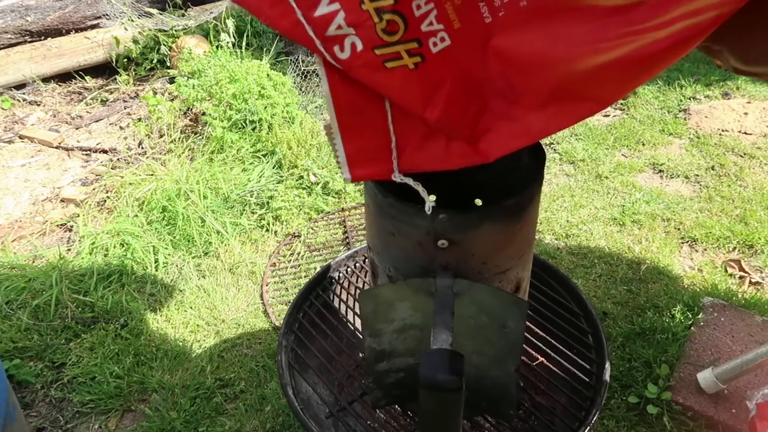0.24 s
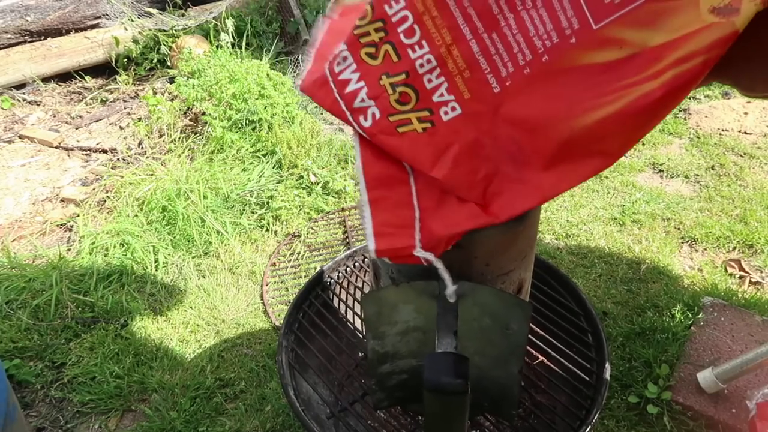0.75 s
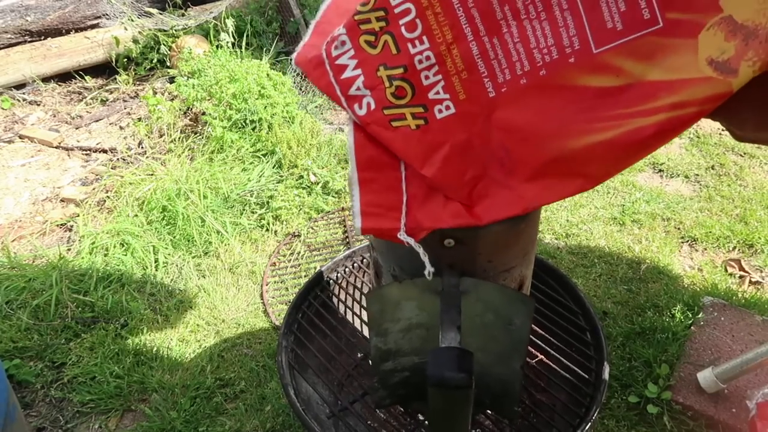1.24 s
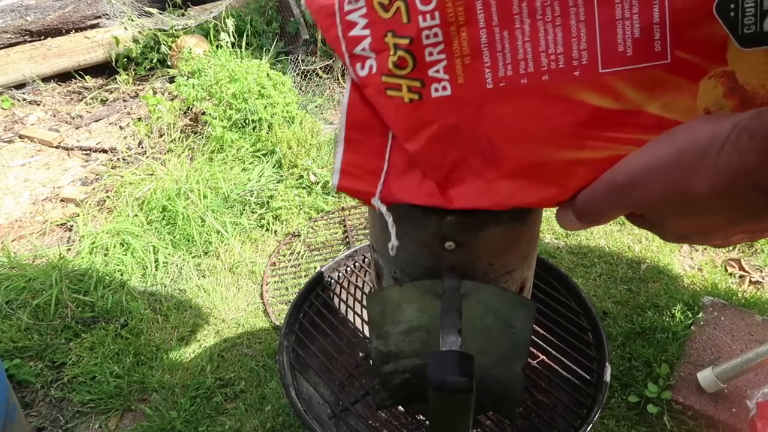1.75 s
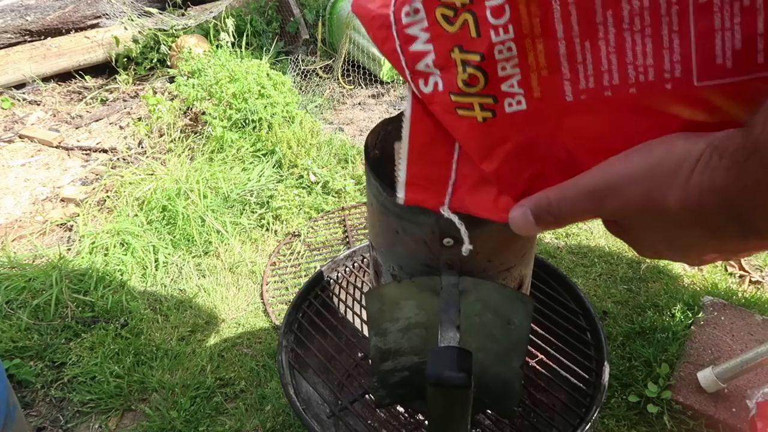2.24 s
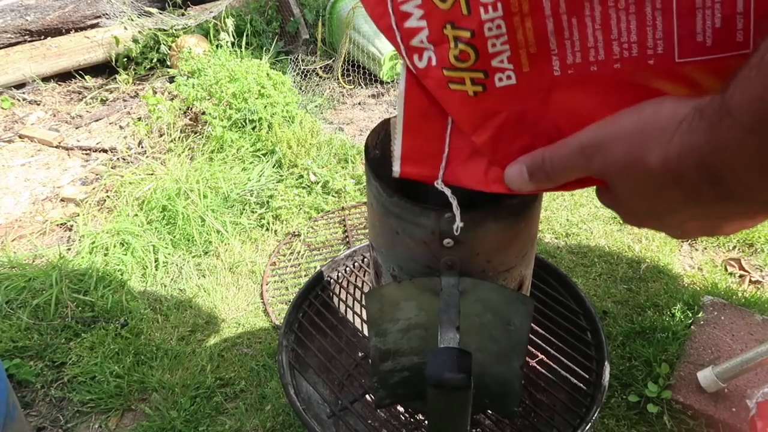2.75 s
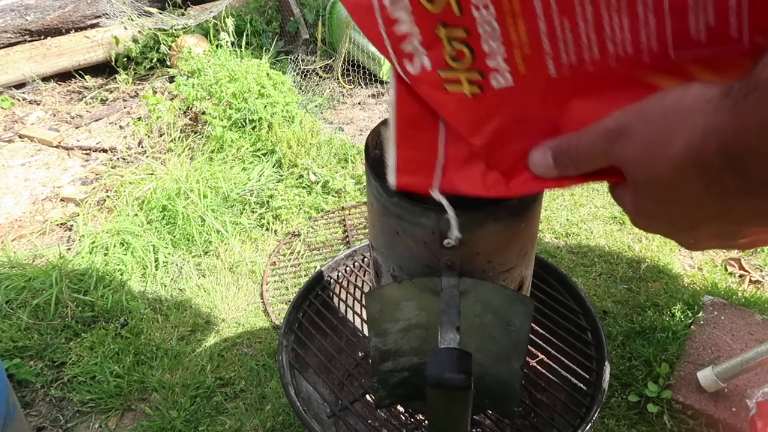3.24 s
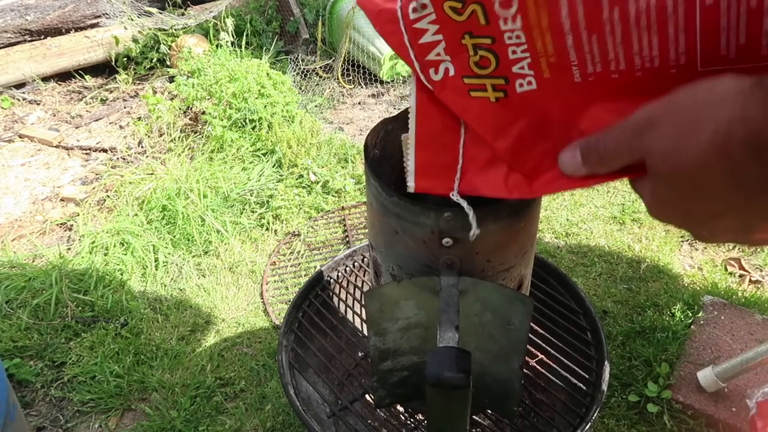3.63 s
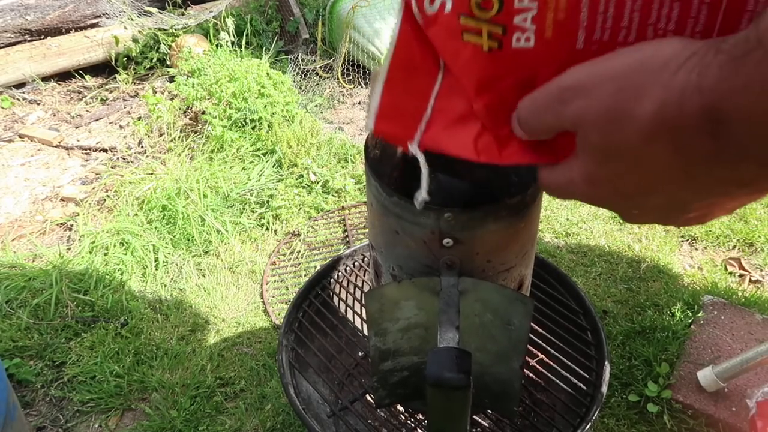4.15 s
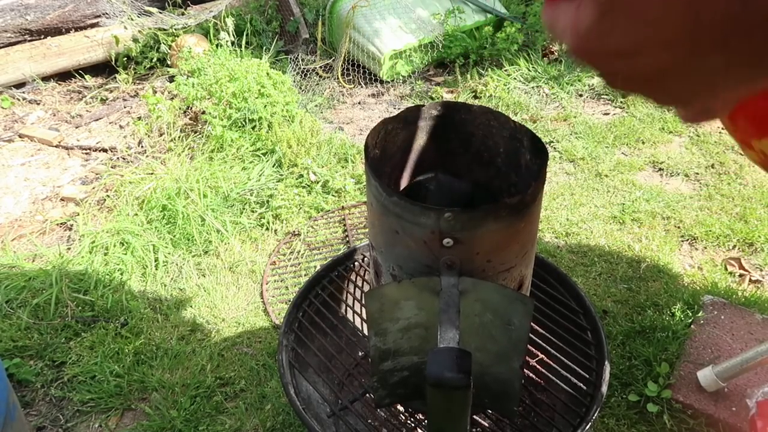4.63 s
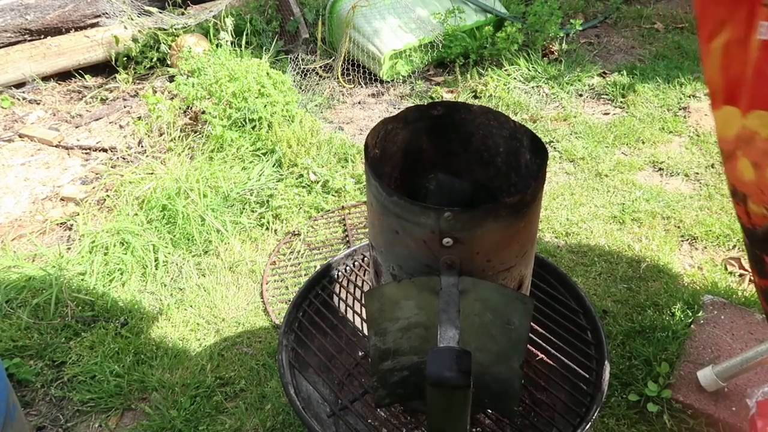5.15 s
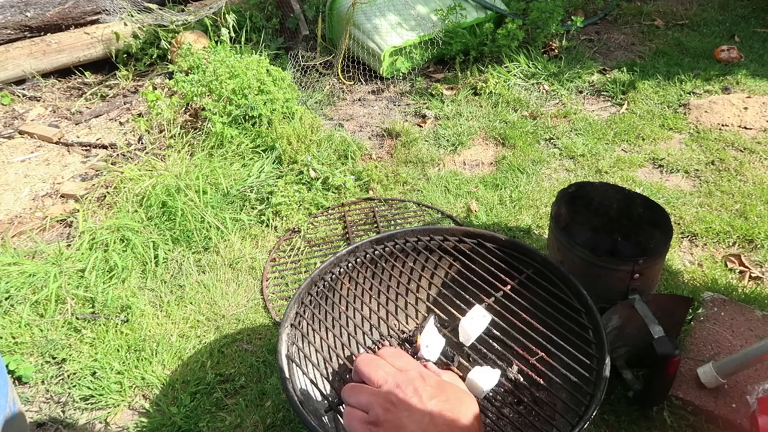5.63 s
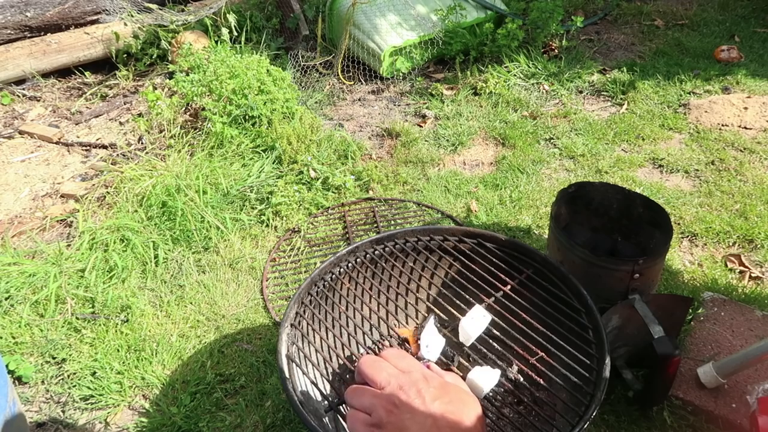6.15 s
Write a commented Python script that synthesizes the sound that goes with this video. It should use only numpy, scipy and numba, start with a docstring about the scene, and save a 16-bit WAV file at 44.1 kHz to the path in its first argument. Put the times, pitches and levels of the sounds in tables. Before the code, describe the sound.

A dense, woody and stony clatter of charcoal tumbles into a thin steel tube, loud and close. It begins with strong bursts, thins to scattered knocks and gritty slides, then swells again before stopping abruptly. Behind it is quiet outdoor air with far traffic. A tiny rustle follows, then faint, husky bird chirps slide downward at the end.

```python
"""Charcoal lumps tumble from a paper bag into a sheet-metal chimney, close to a two-port camera microphone.
Every contact is a sum of damped sines: the loudest blows are timed one by one, the rest rattle at random
with the flow of the pour, and the steel tube adds its ring and a short noisy tail.
A quiet garden of shaped noise lies under all; once the pour is faded out, its distant rumble, a faint
rustle and the sliding whistles of a small bird are left."""
import sys
import numpy as np
from scipy import signal
from scipy.fft import rfft, irfft
from scipy.io import wavfile
from scipy.ndimage import uniform_filter1d
from numba import njit

SR = 44100
rng = np.random.default_rng(int(sys.argv[2]) if len(sys.argv) > 2 else 0)


def output_pcm(signal):
    """Save a mono or channel-first signal as 16-bit PCM at the path in sys.argv[1].

    Samples are clipped to [-1, 1] before scaling.
    """
    pcm = np.clip(np.atleast_2d(signal).T, -1, 1) * 32767
    wavfile.write(sys.argv[1], SR, np.round(pcm).astype(np.int16))


N = 282240
CONTACT_CYCLES = .17  # a ring swells with this time constant, in its own cycles


def undb(db):
    """Gain of a level in dB."""
    return 10 ** (np.asarray(db) / 20)


def at(table, hz):
    """Read (Hz, value) points on a log-frequency axis."""
    f, v = np.transpose(table)
    return np.interp(np.log(hz), np.log(np.maximum(f, 1)), v)


def unit(x):
    """Scale to rms 1."""
    return x / np.sqrt(np.mean(x ** 2))


def surge(rate):
    """Slow chance of rms 1: noise averaged twice over 1 / rate seconds."""
    k = int(SR / rate)
    return unit(uniform_filter1d(uniform_filter1d(rng.standard_normal(N), k), k))


def garden():
    """Distant traffic and leaves: shaped noise whose level wanders a little; something rustles once."""
    # Spectrum of the garden air. Each row: frequency in Hz, relative level in dB per Hz.
    air_spectrum = [(15, -33), (25, -6.5), (70, -11.5), (107, -3.5), (326, -15.5), (781, -18),
                    (1130, -24.5), (12900, -45.5), (14000, -47)]
    # How alike the two ports hear the air. Each row: frequency in Hz, left-right likeness (-1 to 1).
    likeness = [(60, 1), (130, 1), (290, 0.88), (640, 0.66), (1410, 0.6), (3100, 0.38), (6820, -0.23),
                (15000, -0.84)]
    level_db = -42.5
    rustle_s, rustle_length_s, rustle_gain = 5.935, .04, .7

    hz = np.maximum(np.fft.rfftfreq(N, 1 / SR), 1)
    like = np.clip(at(likeness, hz), -.9995, .9995)

    def shaped_noise(sign):
        spectrum = rfft(rng.standard_normal(N)) * undb(at(air_spectrum, hz))
        return irfft(spectrum * np.sqrt(1 + sign * like), N)

    mid, side = shaped_noise(1), shaped_noise(-1)
    wander_db = .8 * surge(15) + .7 * surge(3)
    air = np.array([mid + side, mid - side]) / np.std(mid) * undb(level_db + wander_db)
    # the rustle is a brief lift of the treble of the air
    puff = np.exp(-((np.arange(N) / SR - rustle_s) / rustle_length_s) ** 2)
    treble = signal.lfilter(*signal.butter(2, 1500, "high", fs=SR), air)
    return air + rustle_gain * puff * treble


def bird():
    """Thin, husky sliding whistles: sines unsteady in pitch and level, smeared by distance."""
    # Notes of the bird. Each row: start in seconds, end in seconds, start pitch in Hz, end pitch in Hz,
    # level in dB before the unsteadiness and the smearing.
    notes = [(6.125, 6.19, 4050, 3950, -67), (6.145, 6.245, 3900, 2950, -61), (6.22, 6.29, 4480, 4550, -66),
             (6.325, 6.42, 4580, 4500, -69), (6.33, 6.4, 3950, 3800, -62), (6.345, 6.41, 3750, 2700, -61.5)]
    t, out = np.arange(N) / SR, np.zeros(N)
    for start, end, start_hz, end_hz, db in notes:
        u = np.clip((t - start) / (end - start), 0, 1)
        # steeper slides waver more in pitch
        waver = 0.055 * surge(240) * abs(1 - end_hz / start_hz) ** 0.33
        hz = (start_hz + (end_hz - start_hz) * u) * (1 + waver)
        swell = np.sqrt(2 * np.sin(np.pi * u))
        out += undb(db + 5 * surge(250)) * swell * np.sin(2 * np.pi * np.cumsum(hz) / SR)
    # distance: a short fading noise echo, unlike on the two sides
    fade = np.exp(-np.arange(3000) / 600)
    echo = rng.standard_normal((2, len(fade))) * fade
    far = signal.fftconvolve(out[None], echo / np.sqrt(np.sum(fade ** 2)), axes=1)[:, :N]
    return .6 * out + 1.2 * far


@njit
def ring(start, pole, size, rise, count):
    """Sum of damped sines, each starting between two samples and swelling while the contact lasts."""
    y = np.zeros(count)
    for k in range(len(start)):
        i = max(int(np.ceil(start[k])), 0)
        z = size[k] * pole[k] ** (i - start[k])
        soft = rise[k] ** (i - start[k])
        # stop once the ring has decayed to .003
        end = min(count, i + int(np.log(.003) / np.log(abs(pole[k]))))
        for j in range(i, end):
            y[j] += z.imag * (1 - soft)
            z *= pole[k]
            soft *= rise[k]
    return y


def ports(s, hz, cycles, size, side, contact=CONTACT_CYCLES):
    """Blows reach the left port later; side (spread 1) is where each lands; only treble is shadowed."""
    # Balance of the two ports. Each row: frequency in Hz, left minus right in dB.
    balance = [(150, 0), (500, -.8), (1500, -2.4), (5000, -1.6), (12000, -.3)]
    lag_s, lag_spread_s = 3.4e-5, 8e-6
    pan_db, shadow_hz = 6.5, 4000

    hz = np.minimum(hz, .45 * SR)
    # each ring falls by 60 dB over its cycles
    pole = np.exp((2j * np.pi - np.log(1000) / cycles) * hz / SR)
    rise = np.exp(-hz / SR / contact)
    # the housing lengthens the path for treble
    lag = (lag_s + lag_spread_s * side) * np.clip(.35 + hz / 15000, 0, 1)
    tilt_db = at(balance, hz) + pan_db * side * hz / (hz + shadow_hz)

    def port(sign):
        return ring((s + sign * lag / 2) * SR, pole, size * undb(sign * tilt_db / 2) + 0j, rise, N)

    return np.array([port(1), port(-1)])


def contacts(rate, lo_hz, hi_hz, cycles, scatter_db, count):
    """Random contacts, rate per second, each ringing count pitches; loud ones are rare; rms 1."""
    # Spectrum of the rattle. Each row: frequency in Hz, relative level in dB per Hz.
    rattle_spectrum = [(35, -39), (60, -7), (263, 3.5), (317, 2.5), (762, -15.5), (1300, -16.5),
                       (1560, -17.5), (10100, -29.5), (12200, -26.5), (15000, -102)]
    c = rng.random((int(rate * N / SR), 3 + 2 * count))
    s = c[:, :1] * N / SR
    side = (c[:, 1:2] - .5) * np.sqrt(12)
    # one pitch in each of count equal steps of the range
    hz = lo_hz * (hi_hz / lo_hz) ** ((np.arange(count) + c[:, 3:3 + count]) / count)
    db = -scatter_db * np.log(1 - c[:, 2:3]) + at(rattle_spectrum, hz) + 20 * np.log10(hz)
    size = undb(db) * (2 * c[:, 3 + count:] - 1)
    return unit(ports(*(np.broadcast_to(v, hz.shape).ravel() for v in (s, hz, cycles, size, side))))


def shares(level_db, bright_db):
    """Power of thud, clack and grit for a level and a brightness; grit answers brightness more."""
    clack_db, grit_db, grit_per_bright = -3, -12, 1.7  # clack and grit against the thud at brightness 0
    thud = level_db
    clack = level_db + clack_db + bright_db
    grit = level_db + grit_db + grit_per_bright * bright_db
    return undb([thud, clack, grit]) ** 2


def rattle():
    """Lumps thud on lumps, clack on the wall, and paper and grit crackle; small random slips move the level."""
    # Flow of the pour. Each row: time in seconds, thud level in dB ahead of the tube, brightness in dB.
    flow = [(0.0, -44.5, 9.5), (.06, -29.5, 3), (0.24, -33.5, -0.5), (.33, -36, -2), (.47, -26, -0.5),
            (0.62, -22, -0.5), (0.88, -19, 2), (1.13, -21.5, -1), (1.22, -32, 3.5), (1.55, -17.5, 0.5),
            (1.7, -22, 1.5), (1.78, -25, -1.5), (2.1, -39.5, -1), (2.33, -36.5, 1), (2.6, -40.5, 8),
            (2.92, -27, -3), (3.2, -37, 4.5), (3.47, -34.5, -0.5), (3.62, -40.5, 6.5), (3.86, -21.5, -5),
            (3.93, -57.5, 11.5), (4.14, -40, 6.5), (4.43, -31, 1), (4.66, -24, 2), (4.95, -21, -0.5),
            (5.17, -24.5, 2), (5.35, -19.5, -0.5)]
    # Short slides of several lumps. Each row: start in seconds, length in seconds,
    # thud level in dB ahead of the tube, brightness in dB.
    slides = [(0.034, 0.035, -21, 4.5), (0.347, 0.072, -24.5, 0), (0.475, 0.045, -20.5, -0.5),
              (0.523, 0.037, -20, -2.5), (0.609, 0.098, -22.5, 1.5), (0.697, 0.083, -21, 3.5),
              (0.797, 0.018, -12.5, -1.5), (0.882, 0.037, -13.5, 0), (1.067, 0.081, -16.5, -2),
              (1.151, 0.044, -14.5, 0.5), (1.587, 0.014, -35.5, 17), (1.632, 0.03, -28.5, 10),
              (1.752, .018, -29, 5.5), (1.802, 0.03, -24, 5), (1.909, 0.16, -36, 8.5),
              (2.01, 0.047, -34.5, 7), (2.124, 0.025, -29, -3), (2.339, 0.045, -25.5, 3.5),
              (2.47, 0.098, -26, 0.5), (2.591, 0.066, -20.5, -0.5), (2.663, 0.013, -24, 6),
              (2.689, 0.032, -21.5, -4), (2.833, 0.073, -34.5, 9), (2.95, 0.051, -16, 1),
              (3.102, 0.014, -18, -2.5), (3.2, 0.077, -27, 2), (3.282, 0.079, -23, 2),
              (3.319, 0.061, -18, -3), (3.509, 0.0045, -19.5, -2), (3.592, 0.029, -27.5, 4),
              (3.634, 0.12, -22, 2), (3.707, 0.013, -8, -5), (3.79, 0.05, -24, 1.5),
              (3.951, 0.049, -41, 6.5), (4.087, 0.19, -33, 3.5), (4.215, 0.013, -37.5, 9.5),
              (4.283, 0.0069, -25.5, 0), (4.497, 0.033, -23, -3), (4.584, 0.021, -36, 10),
              (4.663, 0.054, -16, 0), (4.788, 0.075, -25, 3.5), (4.887, 0.042, -21.5, -11),
              (5.009, 0.056, -19.5, 0), (5.094, 0.0074, -37, 15.5), (5.21, 0.11, -27, 0.5)]
    s, level_db, bright_db = np.transpose(flow)
    t = np.arange(N) / SR
    slip = undb(1.2 * surge(37.5))

    thud = contacts(600, 66., 800., 10., 1.7, count=3) * slip
    # dense small chips under fewer, fuller knocks of whole lumps
    chips = contacts(1500, 700., 3000., 32., 1.2, count=2) * slip
    knocks = contacts(180, 400., 3200., 32., 1.6, count=4)
    clack = unit(chips + 1.15 * knocks)
    grit = contacts(9000, 3000., 14000., 30., .9, count=3) * slip

    power = shares(np.interp(t, s, level_db), np.interp(t, s, bright_db))
    for start, length, db, bright in slides:
        # a slide sets in fast, holds and dies away
        u = np.clip((t - start) / length, 0, 8)
        envelope = np.minimum(8 * u, 1) * np.exp(-1.2 * u ** 2)
        power = power + shares(db, bright)[:, None] * envelope
    return sum(x * np.sqrt(p) for x, p in zip((thud, clack, grit), power))


def blows():
    """A loud blow rings the lump's body and bite; chips sound at chance pitches, then bounce ever weaker."""
    # Loud blows of single lumps. Each row: start in seconds, body pitch in Hz, body level in dB,
    # bite pitch in Hz, bite level in dB; the levels are relative, ahead of the strike gain.
    blow_list = [(0.042, 756, -10, 5640, -18), (0.0509, 760, -13, 1820, -23),
                 (0.0905, 845, -17.5, 1660, -26), (0.3446, 1060, -21.5, 3040, -30.5),
                 (0.499, 403, -9.5, 2020, -26), (0.529, 302, -15, 2680, -20.5),
                 (0.537, 560, -17, 2260, -19), (0.8189, 1090, -7.5, 3050, -33),
                 (0.833, 480, -11, 1680, -23), (0.865, 194, -25, 1540, -14), (0.8905, 500, -12, 2700, -26),
                 (0.961, 500, -28, 9650, -18), (1.002, 189, -14, 1660, -22), (1.108, 410, -9, 1580, -17),
                 (1.162, 730, -10, 4750, -25), (1.167, 875, -9.5, 1620, -25),
                 (1.3624, 383, -13.5, 1530, -32), (1.3667, 900, -25, 5900, -22),
                 (1.401, 387, -15, 1440, -39), (1.455, 232, -16, 1500, -22), (1.5491, 229, -12, 1750, -41),
                 (1.6605, 477, -14, 3420, -18), (1.6795, 348, -4.5, 2350, -33),
                 (1.725, 276, -25, 1630, -23.5), (1.92, 850, -17, 2640, -31),
                 (1.9679, 1070, -17, 2760, -18.5), (2.344, 1070, -27, 3330, -23),
                 (2.4571, 567, -12.5, 1940, -17), (2.554, 350, -21, 2500, -20.5),
                 (2.6327, 466, -18, 2050, -18), (2.74, 290, -15, 1480, -32), (2.861, 260, -17, 1840, -14),
                 (2.9648, 476, -22, 2360, -15.5), (3.0097, 323, -7, 1620, -30),
                 (3.108, 168, -24, 3550, -26), (3.2115, 458, -29, 2370, -23),
                 (3.2555, 260, -46, 3100, -17.5), (3.334, 279, -34, 3430, -15.5),
                 (3.647, 167, -17.5, 3270, -13.5), (3.6533, 278, -14, 2190, -14),
                 (3.6906, 340, -13, 2170, -14), (3.6961, 740, -16, 1900, -14),
                 (3.7204, 490, -19, 6600, -13), (3.7237, 333, -20, 2460, -13.5),
                 (3.769, 190, -43, 1600, -23), (3.7903, 266, -10, 1340, -17.5),
                 (3.902, 300, -35, 2570, -27.5), (3.9636, 1020, -39, 2770, -22.5),
                 (4.176, 252, -20.5, 1800, -25), (4.28, 317, -11.5, 1950, -24),
                 (4.321, 815, -16, 2300, -19.5), (4.3281, 900, -18, 2520, -16),
                 (4.3409, 606, -12, 2260, -14.5), (4.38, 239, -18, 2730, -40), (4.394, 330, -13, 1710, -31),
                 (4.447, 430, -26, 1830, -28), (4.528, 740, -28, 6640, -16.5),
                 (4.6842, 406, -10, 1900, -23), (4.705, 724, -23, 1830, -17),
                 (4.7706, 560, -13, 1750, -15.5), (4.899, 384, -12, 2640, -20),
                 (4.919, 224, -12, 1850, -35), (5.0957, 550, -30, 1930, -22.5),
                 (5.2155, 147, -14.5, 1420, -20), (5.243, 550, -30, 1640, -21),
                 (5.285, 177, -14, 1310, -20.5), (5.344, 376, -23, 1350, -23.5)]
    # Pitch ranges of a blow's chips. Each row: low edge in Hz, high edge in Hz, cycles to fade by 60 dB,
    # spread of the bounces in seconds, gain in dB.
    chip_ranges = [(71, 170, 2, 0.0047, 10), (217, 449, 16.3, 0.003, -2), (540, 1445, 18.4, 0.00168, -2.5),
                   (1917, 3800, 87, 0.00115, -5), (4200, 12500, 26, 0.0018, 3.5)]
    count = 5  # chips per range
    strike_db, chips_db, bounce_db = 11, -9, -3.5
    body_cycles, bite_cycles, crack_cycles = 5.5, 15, 4.0
    below_db, above_db = 5.5, 4  # chips weaken by this per octave below and above body and bite

    s, body_hz, body_db, bite_hz, bite_db = np.transpose(blow_list)
    c = rng.random((len(s), len(chip_ranges), count, 3))
    side = (rng.random(len(s)) - .5) * np.sqrt(12)
    # a blow with little bite is a soft one: it swells more slowly
    contact = CONTACT_CYCLES + 0.008 * np.maximum(body_db - bite_db + 8, 0)

    body = ports(s, body_hz, body_cycles, undb(body_db + strike_db), side, contact)
    bite = ports(s, bite_hz, bite_cycles, undb(bite_db + strike_db), side, contact)
    # the crack of the contact fills the band between body and bite
    crack_hz, crack_db = np.sqrt(body_hz * bite_hz), (body_db + bite_db) / 2 - 5.5
    crack = ports(s, crack_hz, crack_cycles, undb(crack_db + strike_db), side, contact)
    out = body - bite + crack

    def loss_db(octaves):
        return np.maximum(-below_db * octaves, above_db * octaves)

    for k, (lo_hz, hi_hz, cycles, spread, gain_db) in enumerate(chip_ranges):
        for j in range(count):
            pitch, delay, sign = c[:, k, j].T
            bounce = max(j - 1, 0)  # the first two chips sound with the blow
            # chips alternate between the lower and upper half of the range
            hz = lo_hz * (hi_hz / lo_hz) ** ((j % 2 + pitch) / 2)
            near_body_db = body_db - loss_db(np.log2(hz / body_hz))
            near_bite_db = bite_db - loss_db(np.log2(hz / bite_hz))
            level_db = np.maximum(near_body_db, near_bite_db) + gain_db
            size = undb(level_db + strike_db + chips_db + bounce * bounce_db) * np.sign(sign - .5)
            out = out + ports(s + bounce * spread * delay, hz, cycles, size, side, contact)
    return out


def chimney(x):
    """The wall rings briefly; scatter in the tube and off the grate adds a treble tail, unlike left and right."""
    # Ring of the steel wall. Each row: frequency in Hz, width in Hz, gain at the peak in dB.
    wall = [(755, 236, -4.5), (1604, 73, -7.5)]
    t60, wet_db, treble_hz = 0.065, -10, 1500  # tail decay in seconds, its gain in dB, its low edge in Hz

    x = x + sum(undb(db) * signal.lfilter(*signal.iirpeak(hz, hz / width, fs=SR), x) for hz, width, db in wall)
    t = np.arange(int(t60 * SR)) / SR
    noise = rng.standard_normal((2, len(t))) * np.exp(-np.log(1000) * t / t60)
    tails = signal.lfilter(*signal.butter(2, treble_hz, "high", fs=SR), noise)
    tails = tails / np.sqrt(np.sum(noise[0] ** 2))
    scatter = signal.fftconvolve(x.mean(axis=0)[None], tails, axes=1)[:, :N]
    return x + undb(wet_db) * scatter


def scene():
    """The pour into the chimney is faded out fast; garden and bird are added to it."""
    pour_end_s, fade_s = 5.345, .012
    pouring = np.clip((pour_end_s + fade_s - np.arange(N) / SR) / fade_s, 0, 1)
    # small radiators send out little deep bass
    no_bass = signal.butter(2, 70, "high", fs=SR, output="sos")
    left, right = signal.sosfilt(no_bass, chimney(rattle() + blows()))
    # long waves press alike on both ports
    side = signal.sosfiltfilt(signal.butter(1, 330, "high", fs=SR, output="sos"), left - right)
    pour = (left + right + side * np.array([[1], [-1]])) / 2
    return pour * pouring + garden() + bird()


def record(dry):
    """The highest peaks are rounded; little is heard above 15.6 kHz."""
    top_hz = 15600
    rounded = np.tanh(0.72 * dry) / 0.94
    return signal.sosfilt(signal.ellip(10, .2, 90, top_hz, fs=SR, output="sos"), rounded)


dry = scene()
out = record(dry)
output_pcm(out)
```